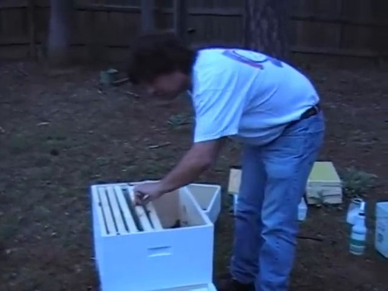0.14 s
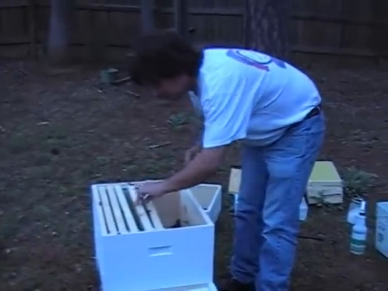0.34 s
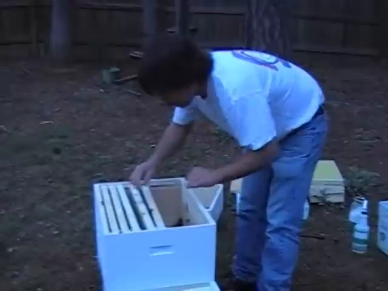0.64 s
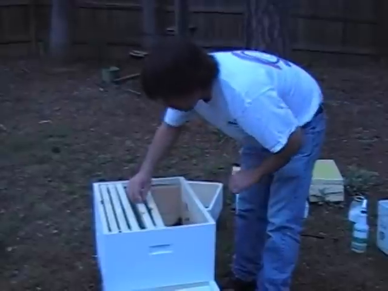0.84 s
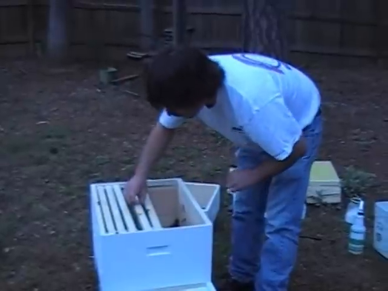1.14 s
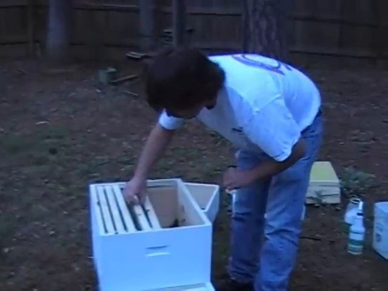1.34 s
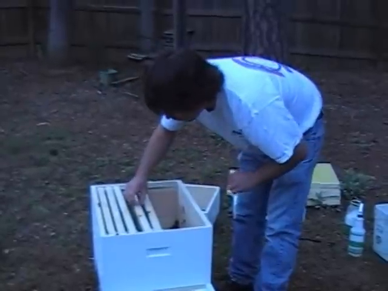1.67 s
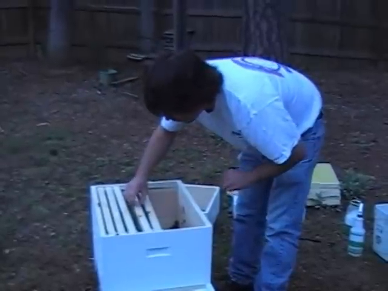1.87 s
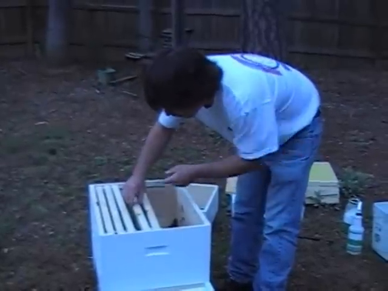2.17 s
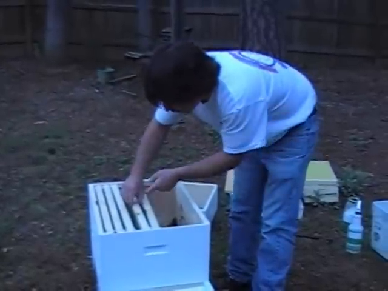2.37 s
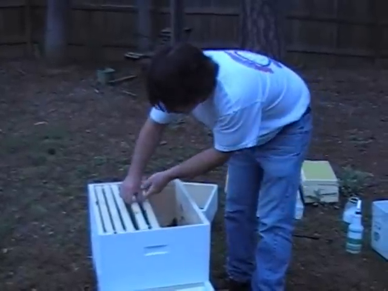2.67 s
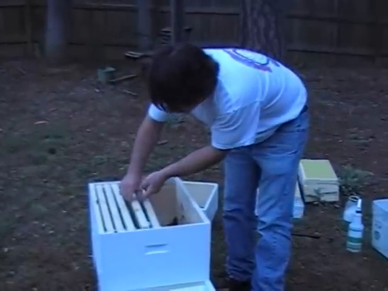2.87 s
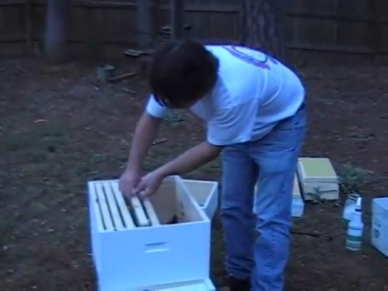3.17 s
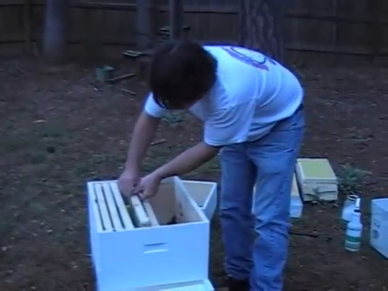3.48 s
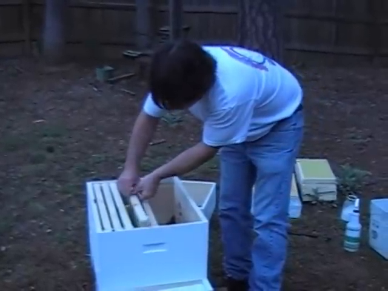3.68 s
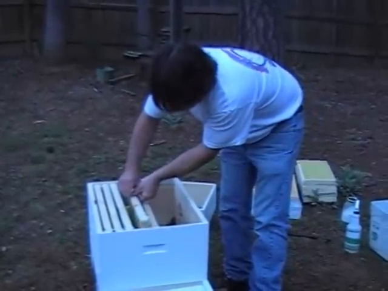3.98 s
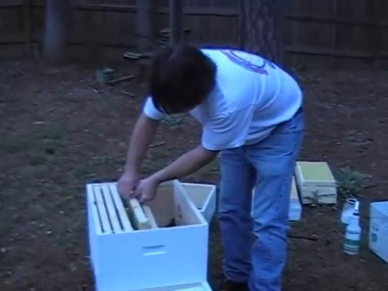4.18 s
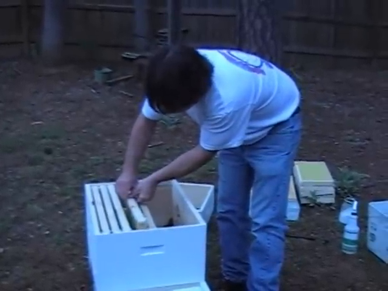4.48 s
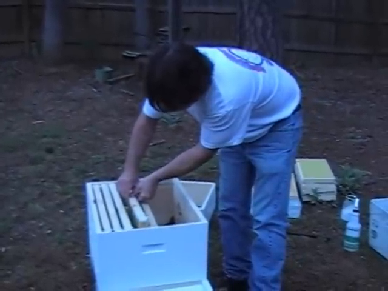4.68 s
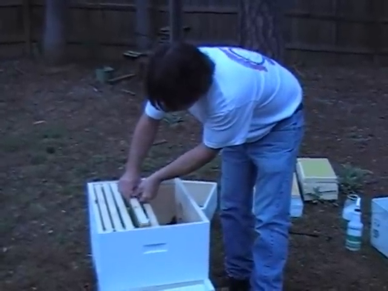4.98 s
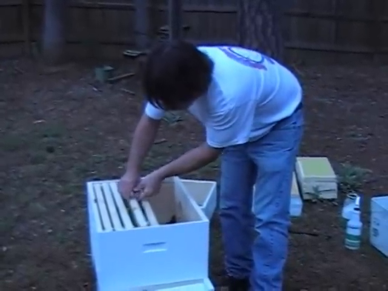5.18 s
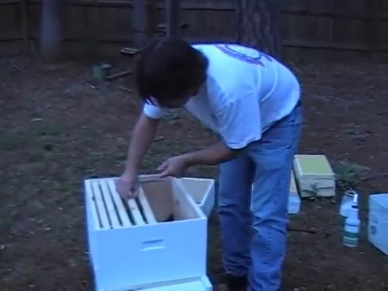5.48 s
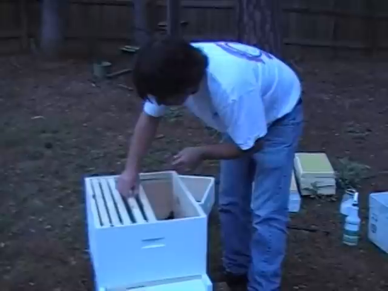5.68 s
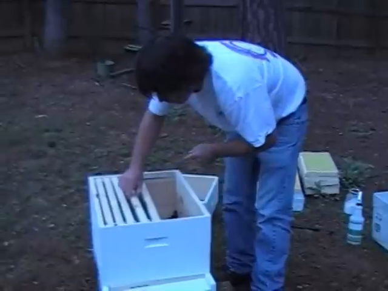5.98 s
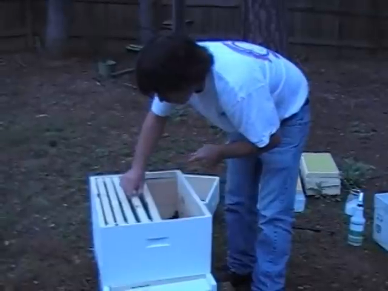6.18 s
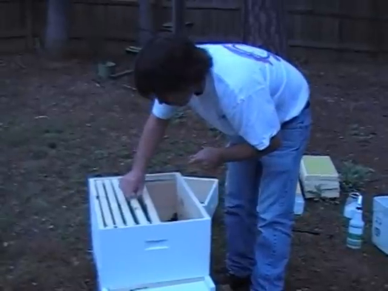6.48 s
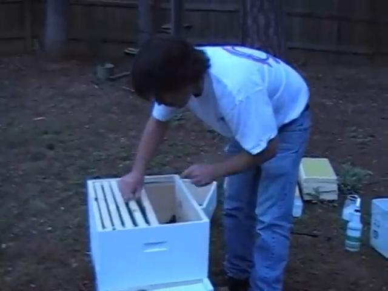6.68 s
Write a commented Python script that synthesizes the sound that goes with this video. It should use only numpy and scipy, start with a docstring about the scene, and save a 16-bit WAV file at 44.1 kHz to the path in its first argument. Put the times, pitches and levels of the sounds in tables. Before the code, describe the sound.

A quiet backyard with soft traffic drone and hiss; a wren warbles, wooden frames click, snap and briefly creak, then a farther wren answers.

```python
"""Backyard at dusk

Distant traffic drones (shaped noise that swells a little) under steady treble hiss and a faint motor hum.
Two wrens repeat phrases of gliding sines that echo among trees and walls, amid scattered peeps and glides.
A few metres from the two-port microphone, wooden frames are handled in a box: ticks, two snaps, a creak
and dull knocks, each a short rattle of contacts through decaying resonances. Wind puffs thump on the ports."""
import sys
import numpy as np
from scipy import signal
from scipy.fft import rfft, irfft
from scipy.io import wavfile

SR = 44100
rng = np.random.default_rng(int(sys.argv[2]) if len(sys.argv) > 2 else 0)


def ratio_of_db(decibels):
    """Turn decibels (scalar or array-like) into linear amplitude factors; 0 dB maps to 1."""
    return 10 ** (np.asarray(decibels, float) / 20)


def file_out(sig):
    """Save sig as 16-bit WAV at sys.argv[1]."""
    # one column per channel
    cols = np.atleast_2d(sig).T
    # limit, then scale
    lim = np.clip(cols, -1, 1)
    pcm = np.round(lim * 32767).astype(np.int16)
    wavfile.write(sys.argv[1], SR, pcm)


N = 301199
TIME = np.arange(N) / SR
OPPOSITE = np.array([[1], [-1]])  # equal and opposite in left and right


def convolve(x, response):
    """Fast convolution cut to the length of the scene."""
    return signal.fftconvolve(x, response)[:N]


def coloured(points, side_points=None):
    """Noise of rms 1 with the spectrum of (f/Hz, level/dB) points; a second set of points re-weights it."""
    log_hz = np.log(np.maximum(np.fft.rfftfreq(N, 1 / SR), 1))

    def gain(table):
        hz, db = np.transpose(table)
        return ratio_of_db(np.interp(log_hz, np.log(hz), db))

    spectrum = gain(points)
    norm = np.sqrt(np.mean(spectrum ** 2))
    if side_points:
        spectrum = spectrum * gain(side_points)
    return irfft(rfft(rng.standard_normal(N)) * spectrum, N) / norm


def drift():
    """Slow random wander with a spread of 1."""
    return coloured([(.1, 0), (1.5, 0), (4, -30), (10, -80)])


def place(x, pan_db):
    """One signal in two channels, left minus right in dB."""
    return x * ratio_of_db(np.array([[pan_db], [-pan_db]]) / 2)


def tail(t60, delay_s, spread):
    """Scattered echoes: decaying noise that swells in, mid energy 1; left and right differ by the spread."""
    t = TIME[:int(t60 * SR)]
    envelope = ratio_of_db(-60 * t / t60) * np.clip(t / delay_s, 0, 1)
    mid, side = rng.standard_normal((2, len(t))) * envelope
    return (mid + spread * side * OPPOSITE) / np.sqrt(np.sum(mid ** 2))


# stereo width of the background: f/Hz, side minus mid level/dB
BACKGROUND_WIDTH = [(60, -5), (110, -8), (190, -3.5), (350, -5), (630, -7.5), (1140, -7.5), (2050, -4.5),
                    (3700, -6.5), (6670, -12), (8500, -6.5), (12000, -9.5)]


def wide(points):
    """Sound from all round: left and right share a mid noise and differ by a side noise."""
    return coloured(points) + coloured(points, BACKGROUND_WIDTH) * OPPOSITE


DRIFT_DB = .5  # spread of the slow drift of traffic and of hiss
# colour of the distant traffic: f/Hz, relative level per Hz/dB
TRAFFIC_COLOUR = [(12, -63), (20, -30), (64, -22.5), (92, -15), (280, -9.5), (307, -6.5), (335, -6.5),
                  (375, -4.5), (410, -3.5), (686, -0.5), (1070, -2), (1280, -7), (1790, -9.5),
                  (2300, -14.5), (4200, -21.5), (5460, -52), (9240, -120)]
# swell of the traffic before its drift: t/s, mid level/dB
TRAFFIC_SWELL = [(0, -50.7), (3.4, -50.5), (4.1, -50), (6.83, -50)]


def traffic():
    """Distant traffic merges into one low noise that swells and drifts."""
    level_db = np.interp(TIME, *np.transpose(TRAFFIC_SWELL)) + DRIFT_DB * drift()
    return wide(TRAFFIC_COLOUR) * ratio_of_db(level_db)


# colour of the treble hiss: f/Hz, relative level per Hz/dB
HISS_COLOUR = [(1760, -24), (3000, -7.5), (3260, -5), (3810, -9.5), (4070, -7.5), (4690, -7.5), (4890, -6),
               (6750, 0.5), (7420, -3.5), (8410, -4.5), (9650, -12), (11100, -13.5), (12500, -19),
               (16200, -48), (22000, -120)]


def hiss():
    """Treble noise, steady but for a slight drift."""
    mean_db = -56.5
    return wide(HISS_COLOUR) * ratio_of_db(mean_db + DRIFT_DB * drift())


# a far motor comes and goes, before its waver: t/s, rms level/dB
HUM_LEVEL = [(0.0, -79), (2.3, -75), (4.6, -74.5), (5.2, -81.5), (6.83, -86)]


def hum():
    """A sine of slowly sagging pitch and wavering level, reaching the two ports out of phase."""
    start_hz, sag_hz_per_s, waver_db = 99.2, 0.298, 3.0
    port_phase = np.array([[.8], [-.8]])  # radians
    turns = np.cumsum(start_hz - sag_hz_per_s * TIME) / SR
    tone = np.sqrt(2) * np.sin(2 * np.pi * turns + port_phase)
    return tone * ratio_of_db(np.interp(TIME, *np.transpose(HUM_LEVEL)) + waver_db * drift())


def struck(events, resonances, rise_ms, first, crack_db, narrow_db):
    """Each blow is a short rattle of contacts: a dry crack, and the resonances near the contact's pitch."""
    out, t = np.zeros((2, N)), TIME[:int(.12 * SR)]
    hz, db, t60 = np.transpose(resonances)[:, :, None]
    rings = np.sin(2 * np.pi * hz * t) * ratio_of_db(-60 * t / t60)
    for s, level_db, pan_db, rattle_ms, contact_hz in events:
        # every blow lands elsewhere, so the resonances are weighted anew
        octaves = np.log2(hz / contact_hz)
        weights = ratio_of_db(db - narrow_db * octaves ** 2 + 2.1 * rng.standard_normal(hz.shape))
        rise = np.minimum((1000 * t + .02) / rise_ms, 1)
        fade = np.exp(-1000 * t / max(rattle_ms, .05)) * rise
        contacts = rng.laplace(size=len(t)) * fade
        contacts[0] = first
        body = signal.fftconvolve(contacts, np.sum(weights * rings, axis=0))[:len(t)]
        crack = ratio_of_db(crack_db) * contacts / np.linalg.norm(contacts)
        blow = body / np.linalg.norm(body) + crack
        # a small thing radiates little far below or above the pitch of the contact
        edges = [contact_hz / 1.7, min(contact_hz * 1.8, 11000)]
        blow = signal.sosfilt(signal.butter(3, edges, "bandpass", fs=SR, output="sos"), blow)
        # a longer rattle carries more energy
        blow *= ratio_of_db(level_db) * np.linalg.norm(fade) / np.linalg.norm(blow)
        i = int(s * SR)
        out[:, i:i + len(t)] += place(blow, pan_db)
    return out


# what colours a tick: rings of the frame and the microphone's resonance near 6.6 kHz:
# f/Hz, level/dB before weighting, t60/s
TICK_COLOUR = [(1660, 12, 0.022), (2096, -19, 0.02), (2500, -13, 0.033), (3270, 0, 0.022),
               (3800, 3, 0.0042), (4350, -8, 0.0048), (4900, -5, 0.013), (6000, -12, 0.01),
               (6690, 6.5, 0.011), (7380, 3, 0.011), (8300, 1.5, 0.008), (8980, 3, 0.0045),
               (9900, 3, 0.006), (11370, 2.5, 0.0043)]


def frame_blows(rows, **touch):
    """Blows (t/s, level/dB, rattle/ms, contact f/Hz) on a frame; bright contacts lean to the right."""
    centre_hz, lean_db_per_octave = 4800, -5.5  # balanced pitch; left minus right
    events = [(s, db, lean_db_per_octave * np.log2(hz / centre_hz), ms, hz) for s, db, ms, hz in rows]
    return struck(events, TICK_COLOUR, **touch)


# frames tick: t/s, level/dB, rattle decay/ms, contact f/Hz
FRAME_TICKS = [(0.2703, -39.5, 3.9, 7300), (1.13, -41.5, 4.1, 5160), (2.4555, -46.5, 8.1, 5430),
               (3.221, -44.5, 5.1, 8300), (3.5355, -40.5, 2.9, 6690), (3.5395, -42.5, 2.3, 2800),
               (3.6237, -36.5, 2.7, 6600), (3.6268, -38, 1.2, 3620), (4.0225, -38, 4.0, 3800),
               (4.0274, -34, 3.4, 5460), (4.033, -36, 1.84, 6000), (4.036, -31, 1.3, 7400),
               (4.0381, -30, 2.6, 3200), (4.5585, -43, 1.12, 7450), (4.5638, -37.5, 2.2, 7500),
               (5.0724, -45, 1.5, 7500), (5.1304, -43, 2.5, 6500), (5.6547, -41.5, 3.7, 8300)]


def ticks():
    """Light touches of the frames crack less and wake fewer resonances."""
    return frame_blows(FRAME_TICKS, rise_ms=.3, first=1, crack_db=-5, narrow_db=25)


def whistle(notes, dwell):
    """Gliding sines under rounded envelopes; dwell under 1 lingers at a glide's high end, over 1 at its low."""
    out = np.zeros(N)
    for s, length, hz0, hz1, db in notes:
        u = np.linspace(0, 1, int(length * SR))
        height = (u if hz1 > hz0 else 1 - u) ** dwell
        hz = min(hz0, hz1) + abs(hz1 - hz0) * height
        tone = np.sin(2 * np.pi * np.cumsum(hz) / SR)
        i = int(s * SR)
        out[i:i + len(u)] += ratio_of_db(db) * np.sin(np.pi * u) ** .7 * tone
    return out


# house walls that throw the song back: delay t/s, level/dB
WALL_RETURNS = [(.062, -4), (.1, -6), (.14, -1.5), (.185, -7), (.27, -7.5)]


def among_trees(voice, pan_db, near_db, far_db, walls_db):
    """Direct sound fluttering in moving air, quick scatter, returns from walls, a long haze from the trees."""
    flutter = ratio_of_db(3.0 * coloured([(1, -10), (10, 0), (70, 0), (200, -30), (400, -60)]))
    # moving leaves blur the pitch of all that they scatter
    blurred = voice * (1 + 0.84 * coloured([(1, -11.0), (130, 9), (300, -12), (600, -60)]))
    returns = sum(ratio_of_db(db) * np.roll(blurred, int(delay_s * SR)) for delay_s, db in WALL_RETURNS)
    scattered = ratio_of_db(near_db) * blurred + ratio_of_db(walls_db) * returns
    quick = [convolve(scattered, h) for h in tail(0.29, 0.00077, 0.34)]
    haze = [convolve(ratio_of_db(far_db) * blurred, h) for h in tail(1.4, 0.013, 0.3)]
    return place(voice * flutter, pan_db) + np.array(quick) + np.array(haze)


# scattered short peeps and glides, some perhaps stray notes or echoes of the singers:
# t/s, length t/s, start f/Hz, end f/Hz, level/dB
SCATTERED_PEEPS = [(.525, .025, 4262, 4360, -60), (.6, 0.016, 2673, 2700, -54.5),
                   (.7, .06, 3300, 2990, -58), (.76, 0.022, 2850, 2100, -60), (.81, .016, 2700, 2710, -54),
                   (1.03, 0.05, 3800, 4000, -61), (1.285, 0.038, 3930, 3810, -60),
                   (1.36, .05, 3950, 3890, -55.5), (1.57, .05, 3920, 3800, -60),
                   (1.775, .04, 3700, 3800, -55), (1.98, .022, 3740, 3750, -62),
                   (4.705, .045, 4190, 4250, -62), (4.84, .028, 3030, 2880, -59),
                   (5.105, .026, 2260, 2200, -57), (5.32, 0.022, 3820, 3620, -57),
                   (5.595, .04, 3020, 2900, -61), (5.655, .025, 2760, 2920, -56),
                   (5.98, .04, 2080, 2240, -61)]


def peeps():
    """Scattered short peeps and glides at an even rate of glide, with strong scatter from the trees."""
    return among_trees(whistle(SCATTERED_PEEPS, 1), pan_db=-1.0, near_db=-4.5, far_db=-2.0, walls_db=-14)


def song(phrase, sung):
    """The phrase laid out at each of its starts, each time with its own level and tilt in dB per octave."""
    notes = []
    for start, level_db, tilt_db, count in sung:
        for offset, length, hz0, hz1, note_db in phrase[:int(count)]:
            # high notes carry best where the beak points
            beam_db = tilt_db * np.log2((hz0 + hz1) / 2 / 3000)
            notes.append((start + offset, length, hz0, hz1, level_db + note_db + beam_db))
    return notes


# notes of the near wren: offset t/s, length t/s, start f/Hz, end f/Hz, relative level/dB
NEAR_NOTES = [(0, 0.0354, 3220, 2956, -6.5), (.032, .022, 2500, 2680, -2), (.048, 0.016, 2820, 2900, -6),
              (.058, .03, 3332, 3348, 0), (.08, .04, 3340, 3040, -2.5), (.16, 0.091, 2139, 2268, -4.5),
              (.295, 0.023, 2630, 2700, -3.5), (.31, 0.0317, 2772, 3020, 1), (.34, 0.0175, 2730, 2227, -5),
              (.355, 0.037, 2114, 1940, -9.5)]
# its phrases: t/s, level/dB, brightness/dB per octave, notes sung/count
NEAR_STARTS = [(.91, -44.5, 0.5, 10), (1.365, -41.5, 4, 10), (1.816, -41, -4, 5)]


def near_wren():
    """The nearer singer, a little left of centre; its glides stay longest at their high end."""
    voice = whistle(song(NEAR_NOTES, NEAR_STARTS), dwell=.75)
    return among_trees(voice, pan_db=2.3, near_db=-10, far_db=-2.2, walls_db=-13)


# what the box rings with: f/Hz, level/dB before weighting, t60/s
BOX_MODES = [(420, -18, .05), (526, 5.5, 0.077), (632, 0, 0.0235), (804, 5, 0.028), (977, -8, 0.092),
             (1246, -3.5, 0.025), (1470, 6.5, 0.012), (1846, 2.5, 0.016), (2270, 0.5, 0.024),
             (2700, 3, 0.032)]
# frames knock on the box: t/s, level/dB, contact f/Hz
BOX_KNOCKS = [(1.045, -41.5, 1070), (1.131, -38.5, 910), (2.4544, -35, 1228), (2.465, -40, 700),
              (3.461, -41, 520), (3.542, -41, 519.5), (3.649, -38.5, 1500), (4.029, -40, 1810)]


def knocks():
    """Soft, slowly rising contacts wake many modes of the box, slightly left."""
    pan_db, rattle_ms = 1.1, 10.7
    events = [(s, db, pan_db, rattle_ms, hz) for s, db, hz in BOX_KNOCKS]
    return struck(events, BOX_MODES, rise_ms=3, first=0, crack_db=2, narrow_db=1.5)


# puffs of wind on the microphone ports: t/s, peak level/dB (left), half-length t/s
WIND_PUFFS = [(1.722, -50, 0.032), (1.968, -58, 0.034), (2.332, -57, .04), (6.235, -54, .03)]


def wind():
    """Low thumps that push the two ports in opposite directions, the right one less."""
    gust = sum(ratio_of_db(db) * np.exp(-((TIME - s) / length) ** 2) for s, db, length in WIND_PUFFS)
    rumble = coloured([(10, -12), (30, -5.5), (80, 0.0), (200, -9), (400, -48)])
    return gust * rumble * np.array([[1], [-.55]])


def hard_blows(rows):
    """Frames that break loose: sharp first contact, full crack, many resonances."""
    return frame_blows(rows, rise_ms=.02, first=5, crack_db=0, narrow_db=8)


# a frame snaps loose: t/s, level/dB, contact f/Hz
FRAME_SNAPS = [(3.6482, -22, 7100), (4.0105, -24, 9300)]


def snaps():
    """Each snap bounces twice, softer and longer each time and duller than the snap."""
    bounce_s, bounce_db, bounce_hz = .002, -3, 4500
    snap_ms, longer_ms = 1.84, .75  # rattle decay of the snap, and its growth per bounce
    rows = []
    for s, db, snap_hz in FRAME_SNAPS:
        for k in range(3):
            hz = bounce_hz if k else snap_hz
            rows.append((s + k * bounce_s, db + k * bounce_db, snap_ms + k * longer_ms, hz))
    return hard_blows(rows)


# notes of the far wren: offset t/s, length t/s, start f/Hz, end f/Hz, relative level/dB
FAR_NOTES = [(0, 0.032, 2782, 2562, -3), (.048, 0.0453, 3006, 2584, -1), (.08, .023, 2600, 2670, -7),
             (.1, .04, 3680, 3910, -5), (.13, 0.041, 2820, 2910, -3), (.15, .048, 3680, 4170, 4.5),
             (.21, .06, 2870, 2890, -7), (.25, 0.031, 3760, 3550, -4), (.28, 0.054, 2130, 2070, -8.5),
             (.385, 0.029, 2344, 2600, -2.5)]
# its phrases: t/s, level/dB, brightness/dB per octave, notes sung/count
FAR_STARTS = [(4.518, -58.5, -1, 10), (5.072, -54, 1, 10), (5.618, -53.5, 1.5, 9)]


def far_wren():
    """High notes beam straight across; low notes spread and arrive mostly as echo."""
    notes = song(FAR_NOTES, FAR_STARTS)
    split_hz, dwell = 3300, 2.22  # split by a note's end pitch
    high = whistle([note for note in notes if note[3] > split_hz], dwell)
    low = whistle([note for note in notes if note[3] <= split_hz], dwell)
    beamed = among_trees(high, pan_db=.1, near_db=-14, far_db=-6, walls_db=-22)
    spread = among_trees(low, pan_db=.1, near_db=-6, far_db=-1, walls_db=-12)
    return beamed + spread


def creak(count=10):
    """A frame creaks free in slightly uneven stick-slip steps that tend to grow louder."""
    start_s, gap_s, mean_hz, slip_ms = 5.081, .0049, 6900, .57
    time_chance, level_chance, pitch_chance = rng.standard_normal((count, 3)).T
    times = start_s + gap_s * (np.arange(count) + .08 * time_chance)
    levels_db = np.linspace(-43, -34.5, count) + 1.5 * level_chance
    pitches = mean_hz * (1 + 0.069 * pitch_chance)
    return hard_blows([(s, db, slip_ms, hz) for s, db, hz in zip(times, levels_db, pitches)])


def handling():
    """All the woodwork in the box, with a faint return from the fences."""
    wood = ticks() + knocks() + snaps() + creak()
    fences = [convolve(wood.mean(axis=0), h) for h in tail(0.39, 0.013, 0.42)]
    return wood + ratio_of_db(-21) * np.array(fences)


def scene():
    """Everything that reaches the microphone."""
    background = traffic() + hiss() + hum()
    whistles = peeps() + near_wren() + far_wren()
    return background + handling() + whistles + wind()


def low_pass(x):
    """Removes everything above the highest recorded frequency."""
    return signal.sosfilt(signal.butter(12, 12620, fs=SR, output="sos"), x)


def record(dry):
    """The finished mix as it is stored."""
    return low_pass(dry)


dry = scene()
out = record(dry)
file_out(out)
```